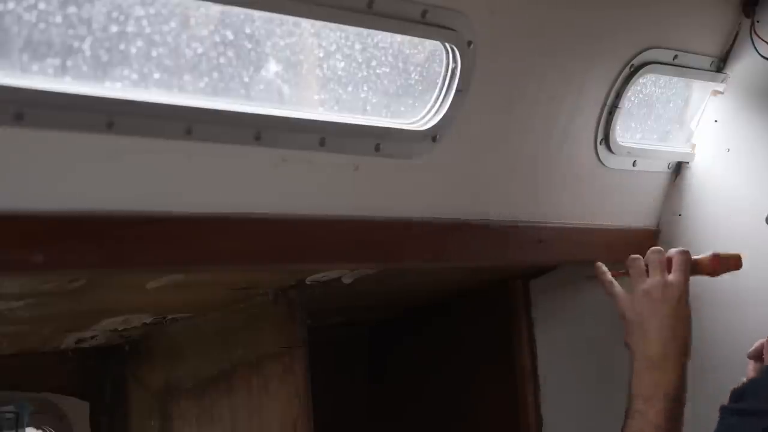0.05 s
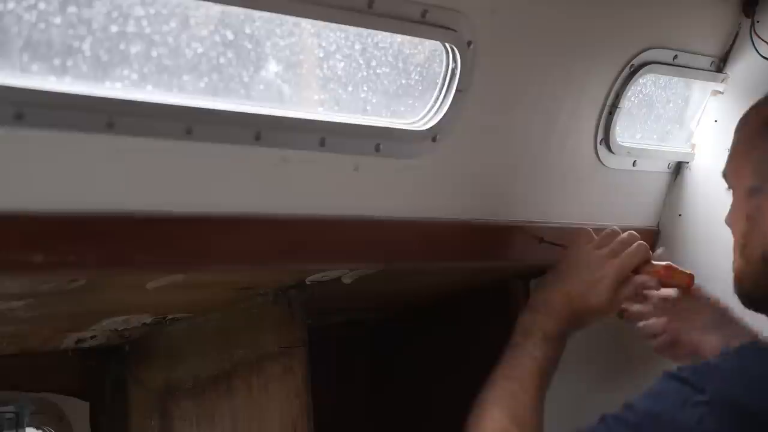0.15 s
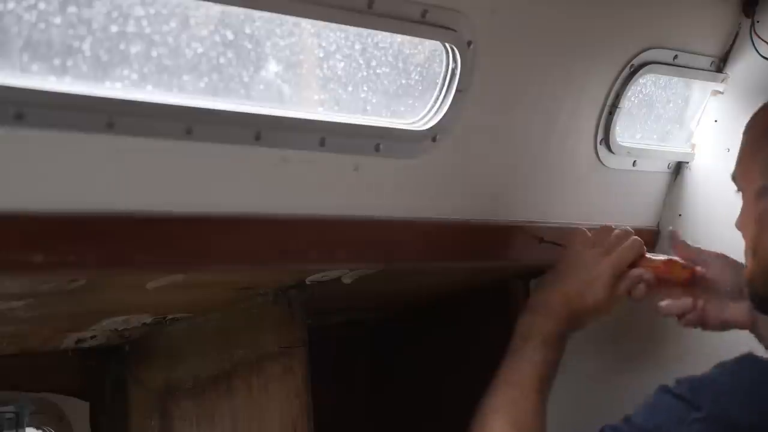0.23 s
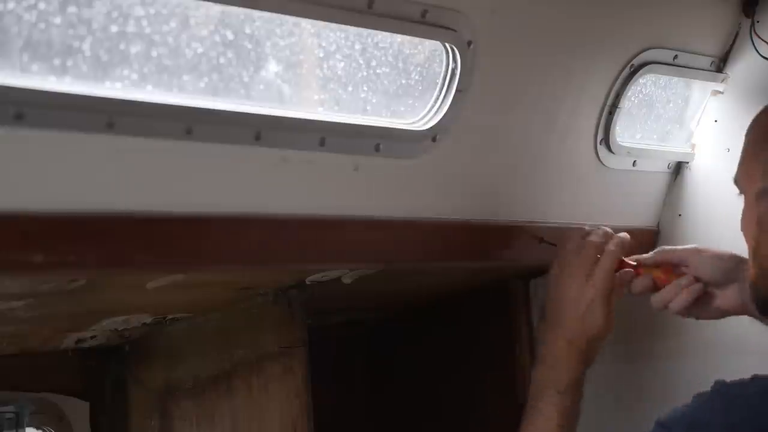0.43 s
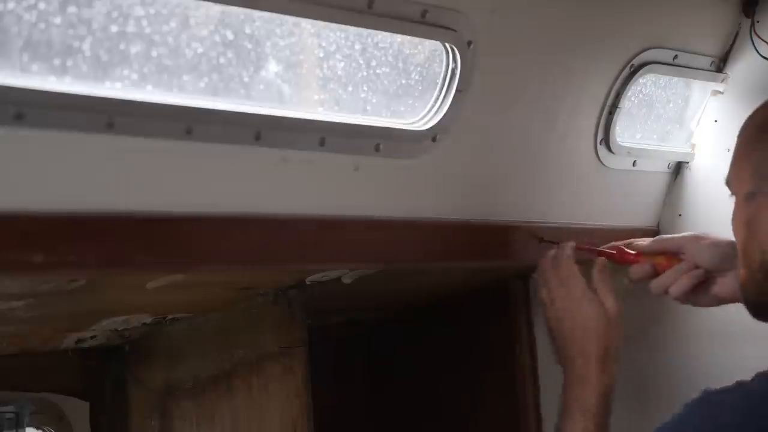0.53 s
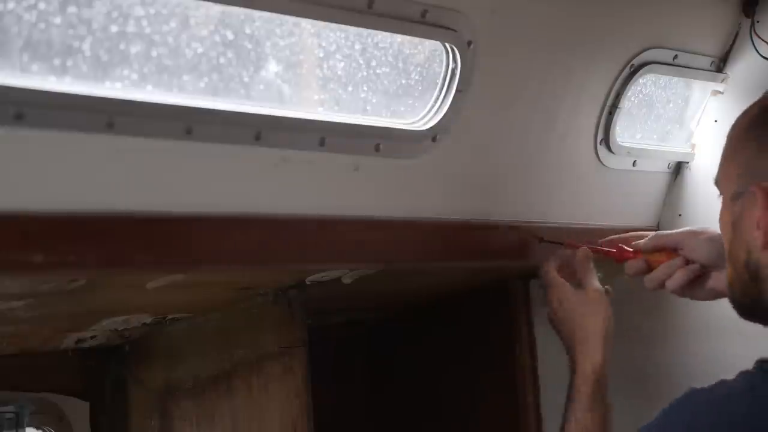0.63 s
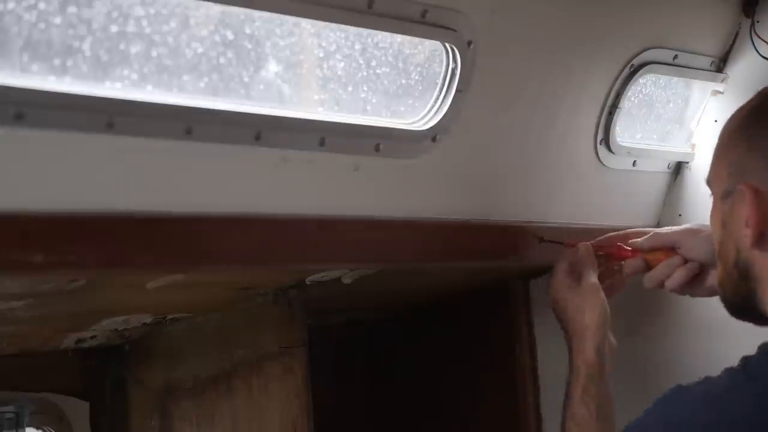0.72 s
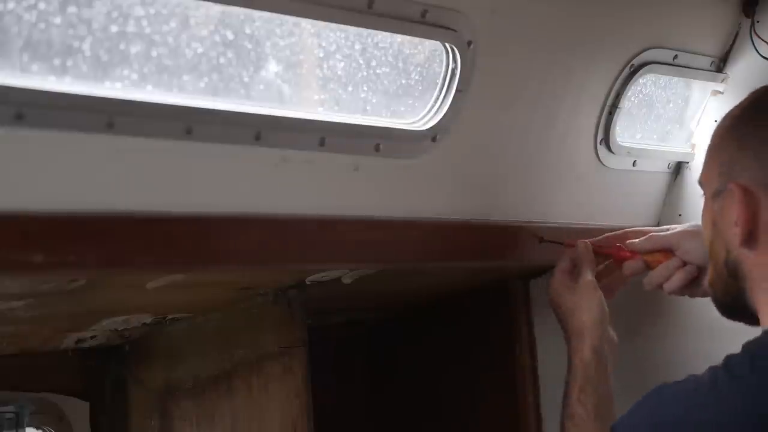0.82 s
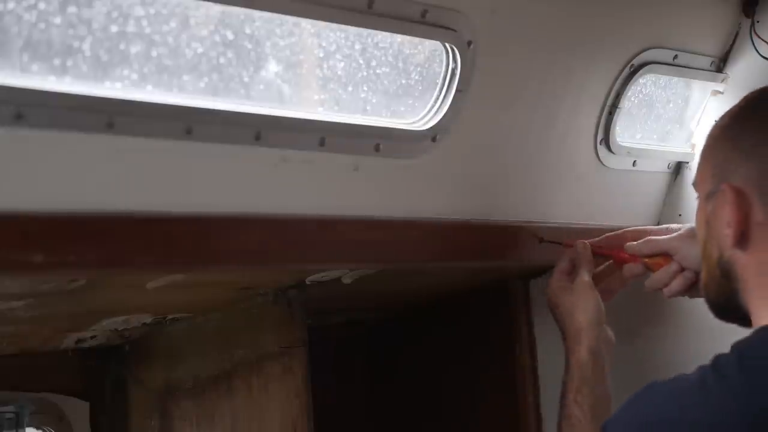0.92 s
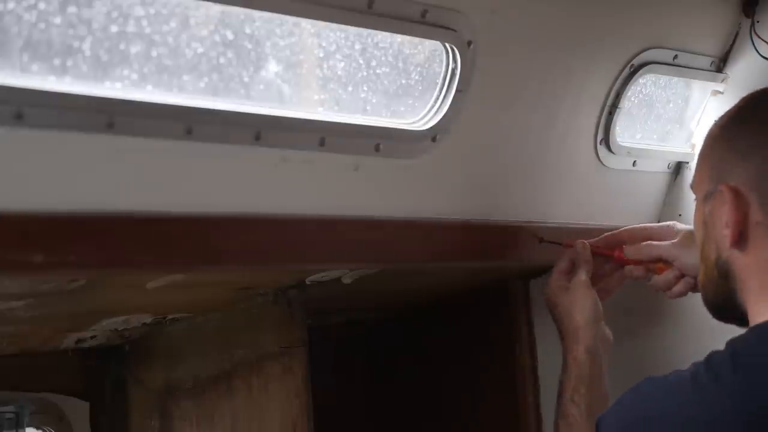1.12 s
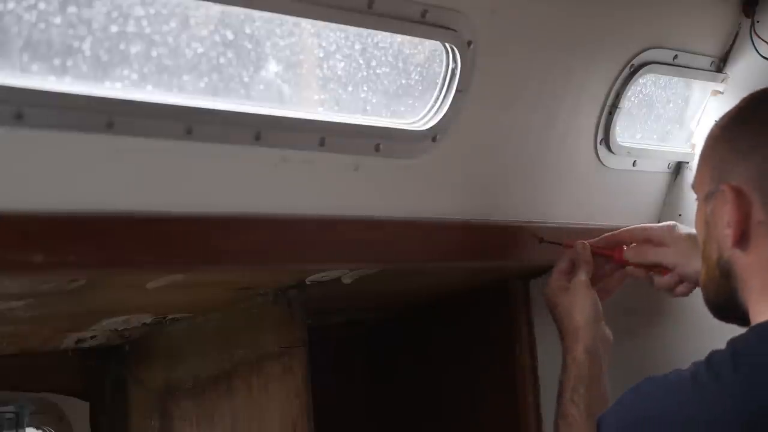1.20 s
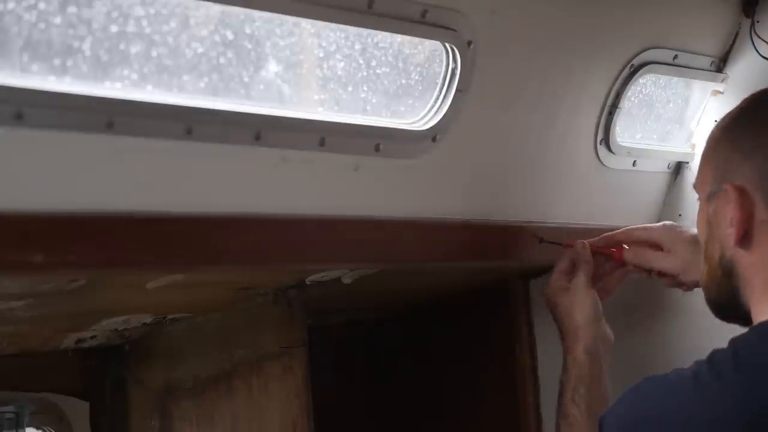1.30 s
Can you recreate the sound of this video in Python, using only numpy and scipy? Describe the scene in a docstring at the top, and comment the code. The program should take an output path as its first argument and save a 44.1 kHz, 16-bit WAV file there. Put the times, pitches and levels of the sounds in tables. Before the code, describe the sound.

A sharp knock of a screwdriver into wooden trim lands at about 0.2 seconds, with a hollow boom, a brief steel ping and a low hum that lingers. Sleeves and a hand brush faintly around 0.5. From 0.7 to 1.2 the blade scrapes the wood more quietly in short catches, with a few bright ticks near 1.1. A faint low rumble fills the small boat cabin throughout.

```python
"""A low rumble fills a small boat cabin, heard on one microphone with the walls close by. A hand knocks
a screwdriver in behind a wooden trim strip: the panelling booms, the steel shaft pings and a few low
hull modes hum on. Sleeves rustle and a hand brushes the varnish. The blade then scrapes along the wood
in short catches and ticks as it is levered."""
import sys
import numpy as np
from scipy import signal
from scipy.fft import rfft, irfft, next_fast_len
from scipy.io import wavfile

SR = 44100
rng = np.random.default_rng(int(sys.argv[2]) if len(sys.argv) > 2 else 0)


def wav_out(sig):
    """Save sig, one row per channel (or a flat mono array), as 16-bit PCM at SR to the path in sys.argv[1]."""
    wavfile.write(sys.argv[1], SR, np.round(np.clip(np.atleast_2d(sig).T, -1, 1) * 32767).astype(np.int16))


N = 59535

# Low rumble of the cabin: time_s, level_db
RUMBLE_LEVEL = [(0, -54.5), (.06, -67), (.18, -66.5), (.4, -46.5), (.6, -54.5), (1.0, -53.5), (1.2, -62.5),
                (1.35, -61)]
# Its spectrum: frequency_hz, relative_db
RUMBLE_SPECTRUM = [(20, -21.5), (60, 2), (100, -4.5), (200, -10.5), (290, -22.5), (450, -24.5),
                   (800, -28.5), (2000, -35.5), (8000, -50)]

# Modes of the panelling and trim strip: pitch_hz, relative_db, t60_s
PANEL_MODES = [(83.2, -16.5, 0.6), (126.3, -5.5, .38), (147.4, -13.5, .55), (210.9, -15, 0.38),
               (313.8, -1.5, 0.35), (341.5, -0.5, 0.23), (358.4, 2, 0.28), (433.6, -6.5, 0.51),
               (463.5, -10, 0.29), (475.2, 1.5, 0.28), (512.3, 1, 0.37), (558, -8.5, 0.4),
               (577, -12.5, 0.45), (656.3, -3, 0.35), (696, -7, 0.39), (737, -6, 0.38), (768.4, -11, 0.4),
               (812, -5.5, 0.51), (843, -1, 0.24), (877.7, 0, 0.39), (893, -4.5, 0.39), (900.7, -5.5, .32),
               (968, -16.5, .42), (1110, -19, 0.44), (1206, -15.5, 0.38)]
# Long modes of the hull, where close neighbours beat: pitch_hz, relative_db, t60_s
HULL_MODES = [(314.9, -2, 3.6), (173.8, 2.5, 1.43), (308, -8, 3.3), (406, 2, 1.08), (408, -12.5, 1.9),
              (413.4, -9.5, 3.5), (456.4, -18, 2.3)]
# Slow wash of the hull's many weak modes: frequency_hz, relative_db
WASH_SPECTRUM = [(50, -6.5), (130, -11), (200, 5), (255, -5.5), (330, -3), (440, 4), (600, -8), (880, -8.5),
                 (1300, -15.5), (2000, -44), (5000, -48)]
# Modes of the steel shaft before the grip tightens: pitch_hz, relative_db, t60_s
SHAFT_MODES = [(1366, 16, 0.31), (1823, 17, 0.17), (2922, -2.5, 0.68), (2972, -2, 0.49), (3670, 2.5, 0.5),
               (5520, 0.5, 1), (5920, -4, .22), (7460, -9, 0.24), (9082, -13.5, .27), (11520, -17.5, 0.18),
               (12840, -25, .3), (13560, -23, .22)]
# Dense boom of the cabin after the blow: frequency_hz, relative_db
BOOM_SPECTRUM = [(25, -12), (70, -4.5), (130, -3.5), (200, -12), (250, -18), (330, -0.5), (500, -2),
                 (620, -4), (900, -6.5), (1080, -14), (1750, -18.5), (2050, -25), (3500, -35), (4500, -42),
                 (7500, -57.5), (16000, -72.5)]
# How long the boom hangs in the cabin: frequency_hz, t60_s
BOOM_DECAY = [(60, 0.25), (200, 0.62), (400, .5), (900, 0.54), (1500, 0.38), (4000, 0.4), (12000, .3)]

# Rustle of sleeves and hands: time_s, level_db
RUSTLE_LEVEL = [(.2, -111.5), (.3, -60.5), (.37, -62.5), (.415, -69.5), (.48, -70.5), (.545, -69),
                (.57, -63.5), (.63, -65), (.71, -59.5), (.745, -71.5), (.9, -64), (1.17, -73),
                (1.24, -71.5), (1.35, -77.5)]
# Its spectrum: frequency_hz, relative_db
RUSTLE_SPECTRUM = [(300, -7.5), (1500, 4.5), (2600, 2), (4000, -3), (6000, -0.5), (8500, 0), (12000, -12),
                   (16000, -12.5)]
# Bright ticks of the tool: start_s, level_db
TOOL_TICKS = [(.305, -59.5), (1.0788, -36.5), (1.1123, -46), (1.135, -64), (1.1606, -43)]
# Their spectrum: frequency_hz, relative_db
TICK_SPECTRUM = [(300, -12), (1200, 4), (3000, -8.5), (4400, -8.5), (6200, -1.5), (10000, -4.5),
                 (12500, -12), (15500, -11)]
# Skin brushing varnish: frequency_hz, relative_db
SWISH_SPECTRUM = [(2000, -27), (4500, -13), (5800, 1), (8000, -2), (10000, -5), (12000, -18), (16000, -20)]

# Scraping force of the blade: time_s, relative_db
SCRAPE_FORCE = [(.69, -83), (.712, -55.5), (.75, -55.5), (.82, -52.5), (.87, -46), (.89, -42.5),
                (.99, -42.5), (1.045, -45.5), (1.08, -46), (1.12, -52), (1.17, -59), (1.23, -68.5),
                (1.35, -83)]
# Friction of steel on wood: frequency_hz, relative_db
SCRAPE_SPECTRUM = [(40, -28), (115, -11.5), (230, -8), (340, -1), (620, -9), (760, -8), (1200, -8),
                   (2400, -15.5), (3400, -20.5), (4600, -24), (7000, -37), (11000, -46), (16000, -60)]
# The blade catches and lets go: start_s, relative_db
BLADE_CATCHES = [(0.707, -46), (0.756, -48), (0.786, -46), (0.819, -41), (0.851, -37), (0.8808, -35.5),
                 (0.917, -39), (0.946, -37.5), (0.985, -36), (1.013, -42), (1.062, -43)]
# Resonances of the strip under the blade: pitch_hz, width_hz, gain_db
STRIP_RESONANCES = [(118, 8.2, 11), (548.5, 8.3, 12.5), (662, 9.6, 11.5), (837, 13, 7), (1093, 6.1, 9),
                    (1236, 30, 4.5), (1806, 21.55, 7), (2510, 330, 4), (3270, 67, 8.5)]

KNOCK_S, KNOCK_ATTACK_S = 0.2175, 0.0001
TIME_S = np.arange(N) / SR


def amp(db):
    """Decibels to gain."""
    return 10 ** (np.asarray(db) / 20)


def unit_rms(x):
    """x scaled to rms 1."""
    return x / np.sqrt(np.mean(x ** 2) + 1e-20)


def along(points, hz):
    """(frequency_hz, value) points read on a log frequency axis."""
    frequencies, values = np.transpose(points)
    return np.interp(np.log(hz + 1), np.log(frequencies + 1), values)


def level(points):
    """Gain per sample from (time_s, level_db) points."""
    return amp(np.interp(TIME_S, *np.transpose(points)))


def since(start_s):
    """Seconds since start_s, zero before it."""
    return np.maximum(TIME_S - start_s, 0)


def fade(t, t60_s):
    """A fall of 60 dB in t60_s."""
    return 1000. ** (-t / t60_s)


def burst(start_s, attack_s, t60_s):
    """Envelope of a blow: a quick rise, then an exponential fall."""
    t = since(start_s)
    return (1 - np.exp(-t / attack_s)) * fade(t, t60_s)


def filtered(x, response):
    """x through a response given as a function of frequency."""
    size = next_fast_len(N + SR // 2)
    return irfft(rfft(x, size) * response(np.fft.rfftfreq(size, 1 / SR)), size)[:N]


def coloured(x, spectrum):
    """x shaped by a spectrum, at rms 1."""
    return unit_rms(filtered(x, lambda hz: amp(along(spectrum, hz))))


def noise(spectrum):
    """Coloured noise of rms 1."""
    return coloured(rng.standard_normal(N), spectrum)


def ring(modes, attack_s, scatter_db):
    """Damped modes set off by the knock, alternate rows in opposite polarity."""
    t = since(KNOCK_S)
    sound = np.zeros(N)
    for k, (hz, db, t60_s) in enumerate(modes):
        gain = (-1) ** k * amp(db + scatter_db * rng.standard_normal())
        sound += gain * np.sin(2 * np.pi * hz * t) * burst(KNOCK_S, attack_s, t60_s)
    return sound


def room_tone():
    """The cabin's low rumble swells and sinks over a faint, steady hiss."""
    return level(RUMBLE_LEVEL) * noise(RUMBLE_SPECTRUM) + amp(-76) * rng.standard_normal(N)


def knock():
    """The blow flexes the strip and rings the panelling, the hull and the steel shaft."""
    flex_hz, flutter_hz, hull_build_s = 776, 70, 0.017
    grip_delay_s, grip_db_per_s = 0.08, 228
    # The grip tightens and damps the shaft; reflections from the near walls make its ring flutter.
    grip = amp(-grip_db_per_s * since(KNOCK_S + grip_delay_s))
    wobble = filtered(rng.standard_normal(N), lambda hz: np.exp(-(hz / flutter_hz) ** 2))
    flutter = 1 + 0.25 * unit_rms(wobble)
    flex = -np.sin(2 * np.pi * flex_hz * since(KNOCK_S)) * burst(KNOCK_S, KNOCK_ATTACK_S, t60_s=0.018)
    panels = ring(PANEL_MODES, attack_s=0.0037, scatter_db=0.5)
    hull = ring(HULL_MODES, hull_build_s, scatter_db=1.0)
    wash = burst(KNOCK_S, hull_build_s, t60_s=2.81) * noise(WASH_SPECTRUM)
    shaft = grip * flutter * ring(SHAFT_MODES, KNOCK_ATTACK_S, scatter_db=2.5)
    return amp(-7.5) * flex + amp(-17) * panels + amp(-33) * hull + amp(-40) * wash + amp(-47) * shaft


def cabin_boom():
    """The near walls answer the blow at once; then each band dies at its own speed."""
    hz, frame_s, bands = signal.stft(noise(BOOM_SPECTRUM), SR, nperseg=512)
    decay = fade(np.maximum(frame_s - KNOCK_S, 0), along(BOOM_DECAY, hz)[:, None])
    tail = signal.istft(bands * decay, SR, nperseg=512)[1][:N]
    t = since(KNOCK_S)
    early = noise(BOOM_SPECTRUM) / (1 + (t / 0.024) ** 6)  # reflections crowd into the first 24 ms
    onset = 1 - np.exp(-t / KNOCK_ATTACK_S)
    return onset * (amp(-17) * tail + amp(-16.5) * early)


def sleeve_rustle():
    """Sleeves and hands rub softly as they move."""
    return level(RUSTLE_LEVEL) * noise(RUSTLE_SPECTRUM)


def tool_ticks():
    """Short bright contacts of the tool, each with a faint tail from the cabin."""
    attack_s = 0.00024
    envelope = np.zeros(N)
    for start_s, db in TOOL_TICKS:
        direct = burst(start_s, attack_s, t60_s=0.013)
        tail = amp(-18.5) * burst(start_s, attack_s, t60_s=0.22)
        envelope += amp(db) * (direct + tail)
    return envelope * noise(TICK_SPECTRUM)


def hand_swish(peak_s=0.474, width_s=0.026):
    """A hand slides along the strip: a soft, high brush of skin on varnish."""
    swell = np.exp(-((TIME_S - peak_s) / width_s) ** 2 / 2)
    return amp(-60) * swell * noise(SWISH_SPECTRUM)


def blade_scrape(slips_per_s=810):
    """Dense tiny slips of the blade, swelling at each catch, heard through the strip's resonances."""
    def strip(hz):
        """The wood lifts a band around each of its resonances."""
        return 1 + sum((amp(db) - 1) * 1j * hz * width / (pitch ** 2 - hz ** 2 + 1j * hz * width)
                       for pitch, width, db in STRIP_RESONANCES)

    slips = (rng.random(N) < slips_per_s / SR) * rng.choice([-1, 1], N)
    grain = unit_rms(coloured(slips, SCRAPE_SPECTRUM) + 0.66 * noise(SCRAPE_SPECTRUM))
    force = level(SCRAPE_FORCE) * (TIME_S > SCRAPE_FORCE[0][0])
    catches = sum(amp(db) * burst(start_s, attack_s=0.0013, t60_s=0.088) for start_s, db in BLADE_CATCHES)
    return filtered(force * grain + catches * noise(SCRAPE_SPECTRUM), strip)


def scene():
    """Everything reaches one microphone inside the cabin."""
    blow = knock() + cabin_boom()
    return (room_tone() + blow + sleeve_rustle() + tool_ticks() + hand_swish() + blade_scrape())[None]


def record(dry):
    """The recorder rounds off the knock's peaks and keeps nothing above its band limit."""
    limit_db, hardness, top_hz = -1.5, 8, 15850
    rounded = dry[0] / (1 + np.abs(dry[0] / amp(limit_db)) ** hardness) ** (1 / hardness)
    return filtered(rounded, lambda hz: 1 / (1 + (hz / top_hz) ** 200))[None]


dry = scene()
out = record(dry)
wav_out(out)
```